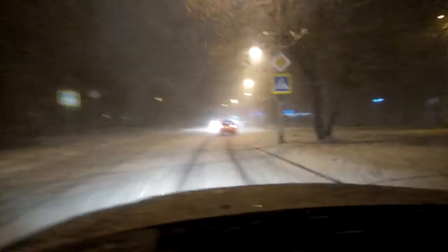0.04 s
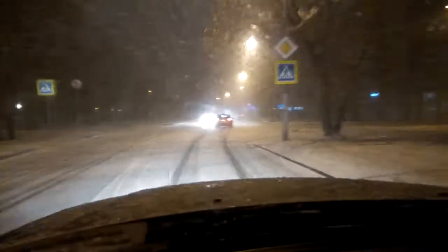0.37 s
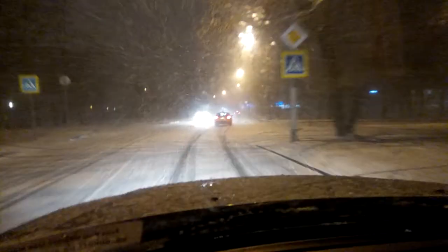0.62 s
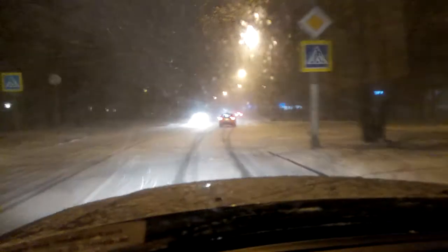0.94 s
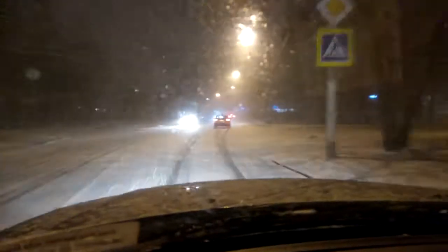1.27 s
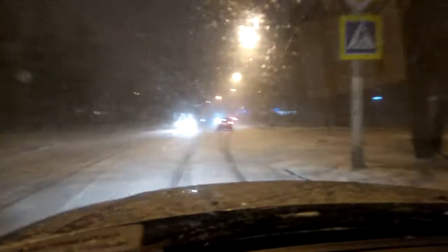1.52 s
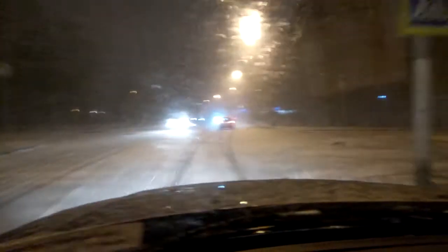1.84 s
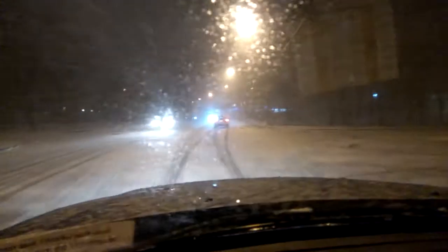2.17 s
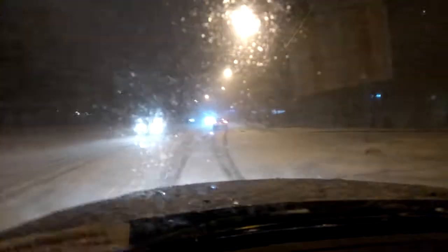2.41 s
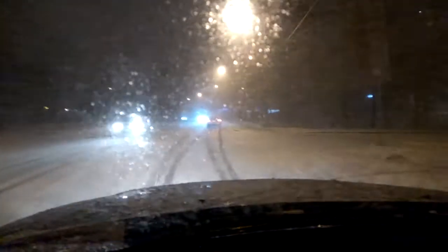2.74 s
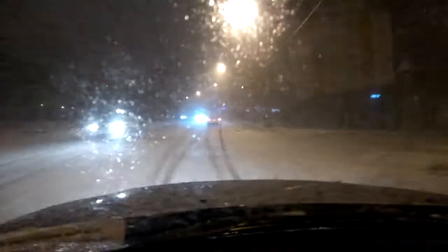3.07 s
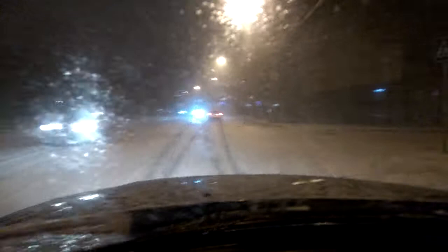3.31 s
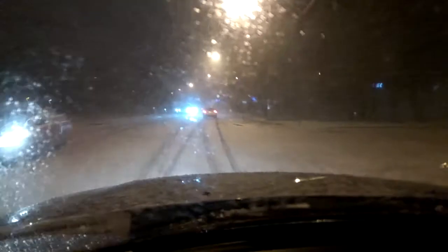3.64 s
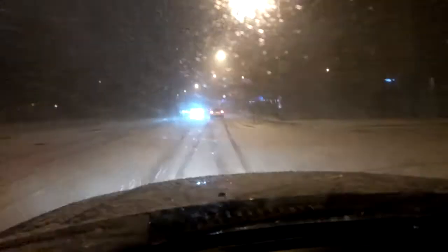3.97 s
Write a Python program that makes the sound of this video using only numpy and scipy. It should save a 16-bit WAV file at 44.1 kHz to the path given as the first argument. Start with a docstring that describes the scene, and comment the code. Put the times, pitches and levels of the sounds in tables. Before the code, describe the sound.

Low rumble of a car driving over packed snow, heard inside with a soft blower hiss.

```python
"""Tyres rumble and sing on a snowy road at night, heard inside a car gathering a little speed.
Packed snow thumps the suspension and sets the body booming and drumming; the engine drones underneath,
slowly rising. The heater blower hisses and hums through its ducts, with a thin whistle and a flickering
fizz on top. A few faint ticks come from the trim."""
import sys
import numpy as np
from scipy import signal
from scipy.fft import irfft
from scipy.io import wavfile
from scipy.ndimage import uniform_filter1d

SR = 44100
rng = np.random.default_rng(int(sys.argv[2]) if len(sys.argv) > 2 else 0)


def store_wav(level_fs):
    """Save 16-bit WAV to argv[1]."""
    pcm = np.round(np.clip(np.atleast_2d(level_fs), -1, 1) * 32767)
    wavfile.write(sys.argv[1], SR, pcm.T.astype(np.int16))


N = 176400
T, HZ = np.arange(N) / SR, np.fft.rfftfreq(N, 1 / SR)


def amp(db):
    """Decibels to gain."""
    return 10 ** (np.asarray(db) / 20)


def unit(x):
    """Scale to rms 1."""
    return x / np.sqrt(np.mean(x ** 2) + 1e-20)


def curve(points):
    """Breakpoints to a per-sample curve."""
    return np.interp(T, *np.transpose(points))


def colour(hz, db):
    """Gain per FFT bin, interpolated on a log frequency axis."""
    return amp(np.interp(np.log(HZ + 1), np.log(hz), db))


def noise(gain):
    """Noise of given amplitude per root Hz; rows share their random phases."""
    return irfft(gain * np.exp(2j * np.pi * rng.random(len(HZ))) * np.sqrt(SR * N / 2), N)


def drift(rate_hz):
    """Low-passed random control signal, rms 1."""
    return unit(noise(np.exp(-(HZ / rate_hz) ** 2) * (HZ > 0)))


def narrowband(hz, width_hz):
    """Complex noise band around a pitch; real part has rms 1."""
    carrier = np.exp(2j * np.pi * np.cumsum(hz * np.ones(N)) / SR)
    return carrier * (drift(width_hz) + 1j * drift(width_hz))


def pan(pan_db):
    """Left and right gains; pan_db is right minus left."""
    return amp(np.array([[-.5], [.5]]) * pan_db)


# freq_hz, density_db_per_hz
RUMBLE_SPECTRUM = [(8, -59), (23, -65), (32, -57.5), (43, -59), (56, -48), (72, -48), (88, -48), (118, -48),
                   (150, -53.5), (180, -55), (225, -56), (280, -60), (335, -65.5), (400, -70), (520, -75.5),
                   (900, -103), (3000, -130)]
# time_s, gain_db
ROAD_ROUGHNESS = [(0, -2.5), (.35, -0.5), (.7, 0), (.9, -3), (1.07, 0), (1.45, -0.5), (1.75, -1.5),
                  (2.3, 0), (2.6, -1.5), (2.9, -3.5), (3.2, 1), (3.55, -.5), (4, 2)]

def tyre_rumble(side_db=-17.5, flutter_db=0.5):
    """Road noise through the floor, nearly the same on both sides."""
    spectrum = colour(*np.transpose(RUMBLE_SPECTRUM))
    side = amp(side_db) * noise(spectrum) * np.array([[1], [-1]])
    return (noise(spectrum) + side) * amp(curve(ROAD_ROUGHNESS) + flutter_db * drift(rate_hz=25))


# time_s, level_db
TREAD_LEVEL = [(0, -50.5), (.45, -47.5), (.85, -51.5), (1.12, -47.5), (1.4, -51.5), (1.65, -45),
               (2.1, -57.5), (2.38, -45), (2.7, -55), (3.1, -49.5), (3.27, -47), (3.55, -49.5), (3.88, -47),
               (4, -54)]

def tread_song(pitch_hz=712, wander_hz=15, width_hz=39, left_lead_rad=.6):
    """The tread sings on the snow, wandering and surging."""
    tone = narrowband(pitch_hz + wander_hz * drift(rate_hz=5.78), width_hz)
    stereo = np.array([tone * np.exp(1j * left_lead_rad), tone]).real
    return pan(pan_db=5) * amp(curve(TREAD_LEVEL)) * stereo


# time_s, level_db
THUMP_LEVEL = [(0, -37), (.3, -28), (.58, -27), (.73, -40), (.83, -26), (.92, -40), (1.08, -26.5),
               (1.3, -32), (1.45, -41), (1.75, -33), (1.95, -30), (2.3, -27.5), (2.5, -32.5), (2.85, -33.5),
               (3.2, -28), (3.55, -27), (3.71, -35), (4, -34)]

def suspension_thumps(mode_hz=68.76, width_hz=17.2, gain_db=-1):
    """Packed snow thumps through the wheels into a broad low resonance."""
    return amp(curve(THUMP_LEVEL) + gain_db) * narrowband(mode_hz, width_hz).real


# time_s, level_db
BOOM_LEVEL = [(0, -42), (.1, -21.5), (.18, -37), (.27, -20), (.37, -36), (.59, -20), (.75, -25.5),
              (.98, -40), (1.06, -20.5), (1.12, -37), (1.36, -25), (1.43, -35), (1.5, -19), (1.6, -36),
              (1.68, -28), (1.95, -22.5), (2.03, -35), (2.12, -20.5), (2.45, -30.5), (2.55, -21.5),
              (2.8, -39), (2.88, -24), (3.4, -27), (3.54, -38), (3.68, -19), (3.82, -19.5), (3.92, -28),
              (4, -38)]

def body_boom(mode_hz=48.43, wander_hz=1.17, gain_db=-1.5):
    """A low cabin mode swells with each rut."""
    cycles = np.cumsum(mode_hz + wander_hz * drift(rate_hz=8.7)) / SR
    envelope = uniform_filter1d(amp(curve(BOOM_LEVEL) + gain_db), size=1500)
    return np.sqrt(2) * envelope * np.sin(2 * np.pi * cycles)


# time_s, level_db
PANEL_LEVEL = [(0, -34), (.7, -34.5), (.9, -40), (1.1, -29.5), (1.7, -43), (2.1, -51), (2.3, -29),
               (2.5, -40), (2.72, -28), (2.95, -40.5), (3.7, -39), (3.85, -28), (4, -33)]

def panel_drumming(mode_hz=128.3, width_hz=12, gain_db=-2.5):
    """Body panels drum in a higher, broader mode."""
    return amp(curve(PANEL_LEVEL) + gain_db) * narrowband(mode_hz, width_hz).real


# time_s, firing_hz
FIRING_RATE = [(0, 93.76), (.6, 94.5), (1.2, 97.3), (1.8, 98.7), (2.3, 100.7), (2.95, 100.9), (3.4, 106.1),
               (3.7, 104.6), (4, 106.5)]
# time_s, level_db
ENGINE_LEVEL = [(0, -32.5), (.45, -34), (.68, -37), (.92, -24.5), (1.1, -34), (1.25, -27), (1.45, -37.5),
                (1.54, -22.5), (1.65, -26.5), (2.2, -25), (2.4, -30.5), (2.69, -34), (2.77, -19),
                (2.93, -25), (3.05, -24.5), (3.2, -28), (3.42, -24), (3.55, -27), (3.7, -35), (3.85, -26),
                (4, -26)]
# firing_multiple, gain_db
ENGINE_ORDERS = [(.5, -15), (1, -4), (1.5, -17), (2, -21), (2.5, -27)]

def engine_drone(flutter_db=2.4):
    """Orders of the firing rate, each unsteady in level."""
    cycles = np.cumsum(curve(FIRING_RATE)) / SR
    orders = np.zeros(N)
    for multiple, gain_db in ENGINE_ORDERS:
        gain = amp(gain_db + flutter_db * drift(rate_hz=15))
        orders += gain * np.sin(2 * np.pi * (multiple * cycles + rng.random()))
    return np.sqrt(2) * amp(curve(ENGINE_LEVEL)) * orders


# freq_hz, left_db_per_hz, right_db_per_hz
VENT_SPECTRUM = [(40, -69, -72), (151, -65, -86), (323, -74, -70), (450, -93, -74), (563, -83, -71.5),
                 (674, -70.5, -67), (807, -77, -68), (934, -85.5, -81), (1140, -79, -76),
                 (1770, -79.5, -73.5), (2060, -78.5, -75), (2180, -80, -81), (2830, -85, -77),
                 (3770, -82.5, -79), (4940, -89, -82.5), (5300, -88.5, -81.5), (6680, -89, -83.5),
                 (7880, -96.5, -93.5), (8800, -103, -101.5), (13800, -112, -108), (14700, -128, -126)]
# centre_hz, width_hz, left_db_per_hz, right_db_per_hz, left_lead_rad
DUCT_MODES = [(426.5, 55, -62.5, -62, -0.13), (469, 70, -69, -65, 0.1), (512, 45, -69.5, -64.5, 1.5),
              (608.5, 46, -69, -67, -1), (750, 51, -79, -72.5, 2.5), (856, 75, -97, -72, 4),
              (900, 40, -71.5, -73, 2), (1043, 120, -76.5, -89, 1.2), (1270, 91, -74.5, -74.5, 2.5),
              (1487, 36, -69.5, -76, 2), (1900, 67, -90, -83, 3.5), (2200, 280, -92, -86, -4.5),
              (2512, 160, -79, -75, -1), (2745, 54, -73, -76.5, 1), (2865, 46, -77.5, -74.5, 0),
              (2980, 170, -85, -76, 1.5), (3270, 110, -84, -84, 0), (3806, 64, -82, -83.5, 1.5),
              (9700, 140, -94.5, -102, 0.5)]
# time_s, gain_db
HISS_GAIN = [(0, -0.55), (.7, -1), (1.6, -0.26), (2.6, 0.1), (3.1, 0.1), (3.5, 0.3), (4, 0.5)]

def blower_hiss(ripple_db=1.94, flutter_db=0.35):
    """Diffuse vent hiss plus air ringing in the ducts and cabin."""
    freq_hz, *sides_db = np.transpose(VENT_SPECTRUM)
    air = np.zeros((2, N))
    for channel, density_db in enumerate(sides_db):
        ripple = np.interp(HZ, T * SR / 6, drift(rate_hz=97))  # drift laid along the frequency axis
        air[channel] = noise(colour(freq_hz, density_db) * amp(ripple_db * ripple))
    for centre_hz, width_hz, left_db, right_db, left_lead_rad in DUCT_MODES:
        resonance = 1 / (1 + (np.sqrt(2) * (HZ - centre_hz) / width_hz) ** 2)
        sides = np.array([[amp(left_db) * np.exp(1j * left_lead_rad)], [amp(right_db)]])
        air += noise(resonance * sides)
    return air * amp(curve(HISS_GAIN) + flutter_db * drift(rate_hz=21))


# pitch_hz, level_db, pan_db
HUM_TONES = [(400.5, -47.5, -1), (507.7, -53.5, 5)]
# time_s, gain_db
HUM_GAIN = [(0, -2), (.35, -0.5), (.6, 1.5), (1.25, 2), (1.5, -1.5), (2, 0), (2.9, 2), (3.4, -3), (3.7, -8),
            (4, -18)]

def blower_hum(wander_hz=1.43, flutter_db=2.5):
    """Two wavering tones of the blower wheel."""
    out = np.zeros((2, N))
    for pitch_hz, level_db, pan_db in HUM_TONES:
        cycles = np.cumsum(pitch_hz + wander_hz * drift(rate_hz=11.5)) / SR
        tone = amp(flutter_db * drift(rate_hz=8.7)) * np.sin(2 * np.pi * cycles)
        out += pan(pan_db) * amp(level_db) * unit(tone)
    return out * amp(curve(HUM_GAIN))


# time_s, pitch_hz, level_db
WHISTLE_TRACK = [(0, 2930, -63), (.8, 2976, -64), (1.7, 2955, -61), (2.2, 2978, -55.5), (2.65, 2982, -52.5),
                 (3.1, 2970, -54.5), (4, 2987, -56)]

def gap_whistle(width_hz=24):
    """Air through a narrow gap: a faint, breathy tone creeping upward."""
    time_s, pitch_hz, level_db = np.transpose(WHISTLE_TRACK)
    tone = np.array([narrowband(np.interp(T, time_s, pitch_hz), width_hz).real for _ in range(2)])
    return pan(pan_db=3) * amp(np.interp(T, time_s, level_db)) * tone


# freq_hz, density_db_per_hz
GRIT_SPECTRUM = [(2000, -112), (5000, -90.5), (8000, -94.5), (10000, -103), (14000, -111), (14700, -128)]

def grit_fizz(flutter_db=4.5, swell_db=1.5):
    """Flickering treble, like fine snow grit on the car."""
    clumps = amp(flutter_db * np.tanh(drift(rate_hz=34)) + swell_db * np.tanh(drift(rate_hz=9.2)))
    spectrum = colour(*np.transpose(GRIT_SPECTRUM))
    return unit(clumps) * np.array([noise(spectrum) for _ in range(2)])


def tick(decay_s, snap_db=8, tail_db=-22, tail_s=.005, band_hz=(1500, 8500)):
    """One-sample snap, decaying scratch and short cabin scatter; peak 1."""
    t = T[:SR // 30]
    envelope = np.exp(-t / decay_s) + amp(tail_db) * np.exp(-t / tail_s)
    burst = rng.standard_normal((2, len(t))) * envelope
    burst[:, 0] = amp(snap_db)
    burst = signal.sosfilt(signal.butter(1, band_hz, "band", fs=SR, output="sos"), burst)
    return burst / abs(burst).max(1, keepdims=True)


# start_s, peak_db, pan_db, decay_s
TRIM_TICKS = [(.058, -42, 5, .007), (.872, -48, 0, .002), (1.383, -49, 1, .005), (1.764, -42.5, 9, .0035),
              (3.268, -48, 0, 0.0056), (3.279, -42.5, 0, .007), (3.3072, -28, 0, .00003),
              (3.422, -46, 0, .002), (3.785, -49, 2, .004), (3.866, -41, 5, .007)]

def trim_ticks():
    """Loose trim ticks as the car shakes."""
    out = np.zeros((2, N))
    for start_s, peak_db, pan_db, decay_s in TRIM_TICKS:
        burst, start = tick(decay_s), round(start_s * SR)
        out[:, start:start + burst.shape[1]] += amp(peak_db) * pan(pan_db) * burst
    return out


def scene():
    """Stereo mix at the front seats."""
    low = engine_drone() + tyre_rumble() + suspension_thumps() + body_boom() + panel_drumming()
    driving = pan(pan_db=0.64) * low + tread_song()
    return driving + blower_hiss() + blower_hum() + gap_whistle() + grit_fizz() + trim_ticks()


def record(dry):
    """Linear-phase low-pass."""
    cutoff_hz = 15600
    taps = signal.firwin(255, cutoff_hz, window=("kaiser", 8), fs=SR)
    return signal.oaconvolve(dry, taps[None], "same")


dry = scene()
out = record(dry)
store_wav(out)
```